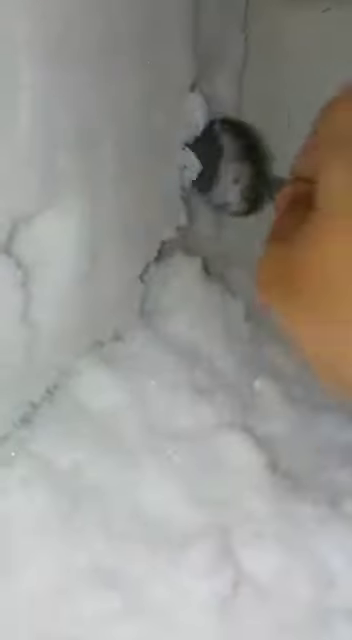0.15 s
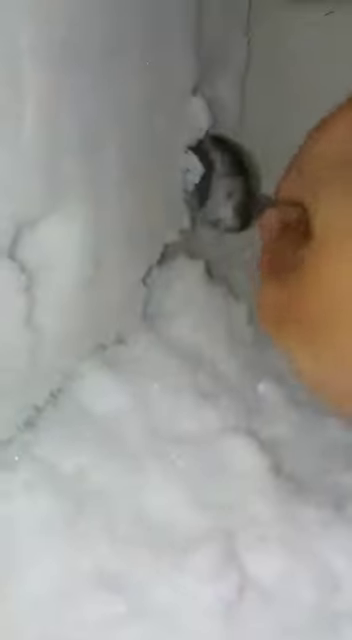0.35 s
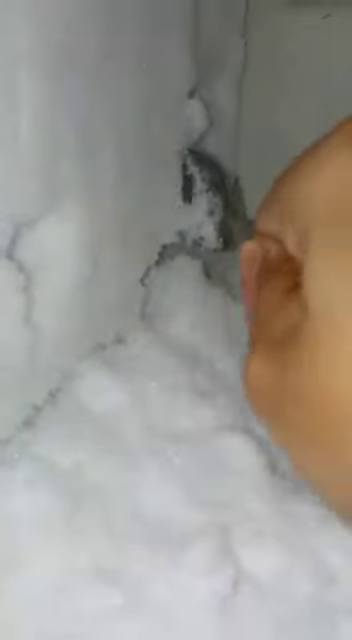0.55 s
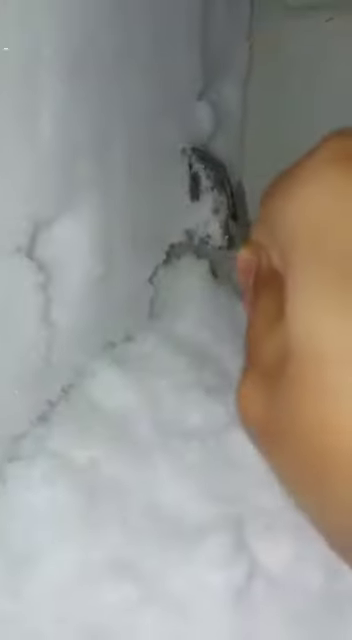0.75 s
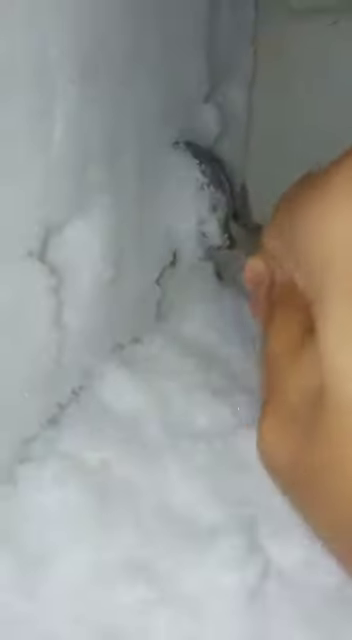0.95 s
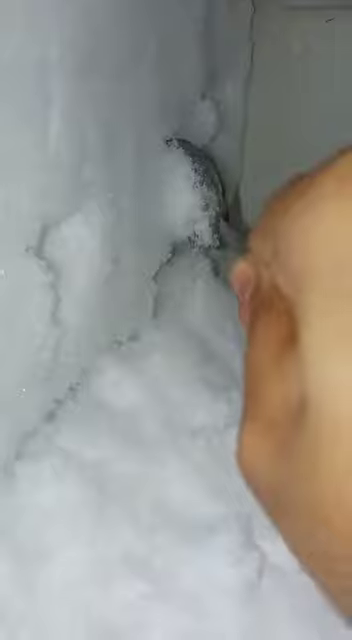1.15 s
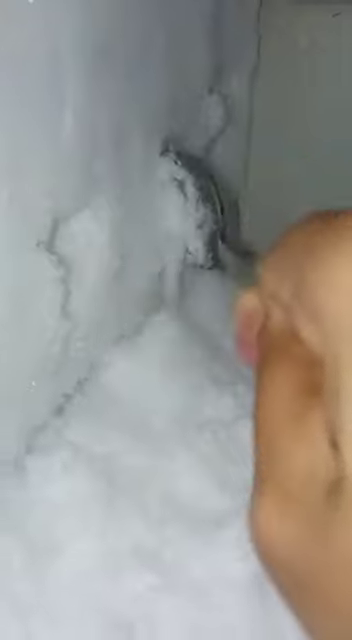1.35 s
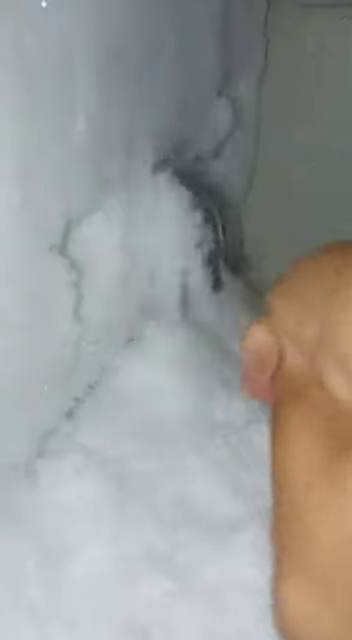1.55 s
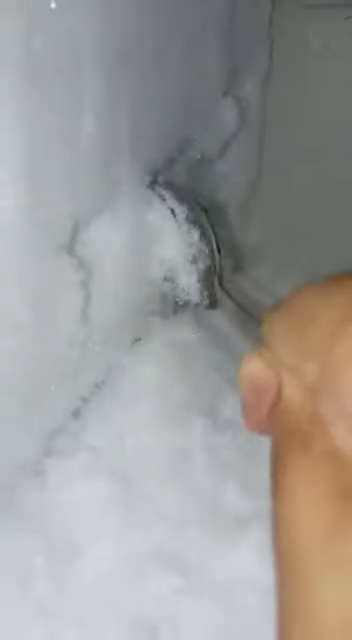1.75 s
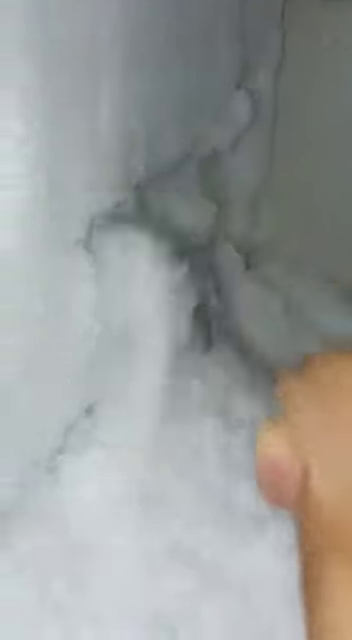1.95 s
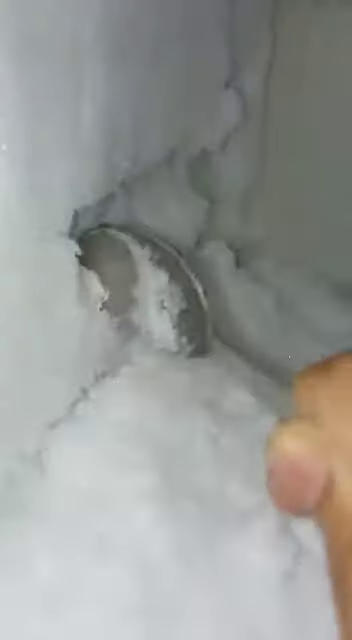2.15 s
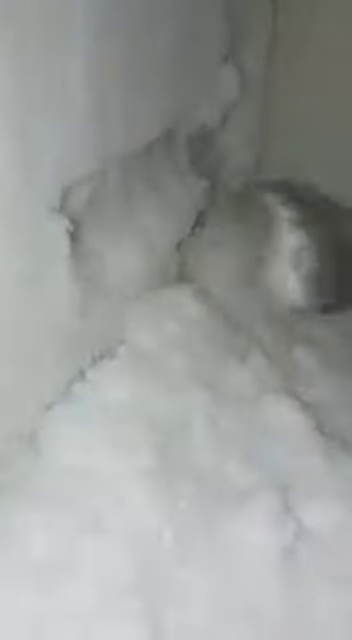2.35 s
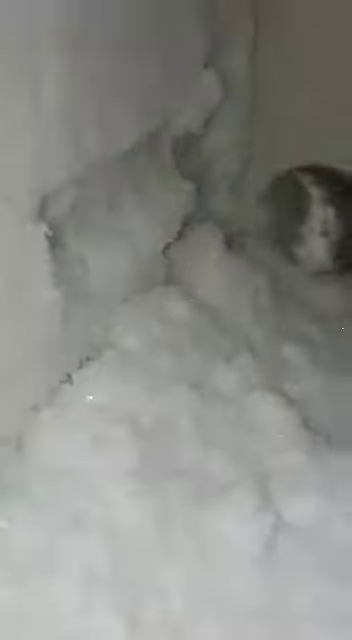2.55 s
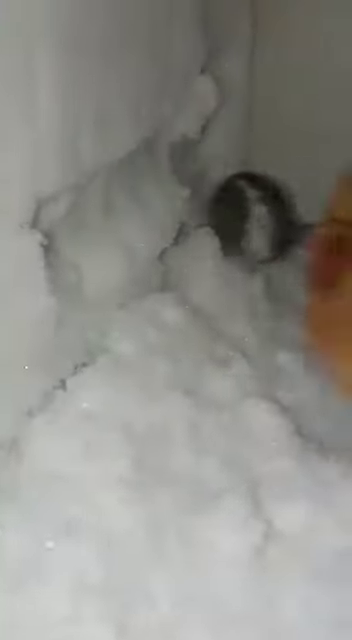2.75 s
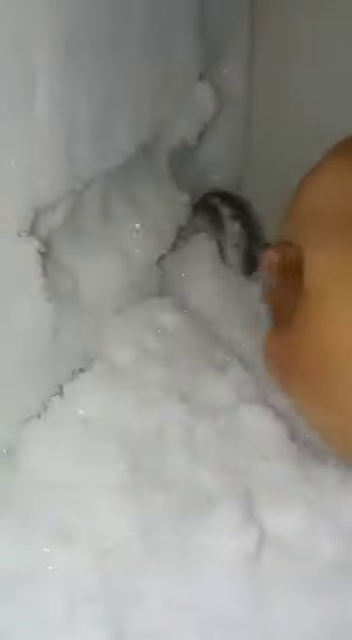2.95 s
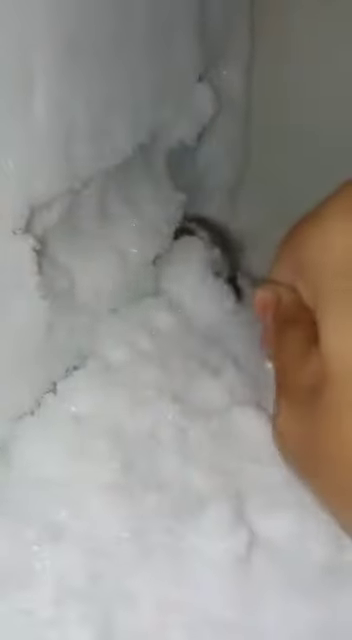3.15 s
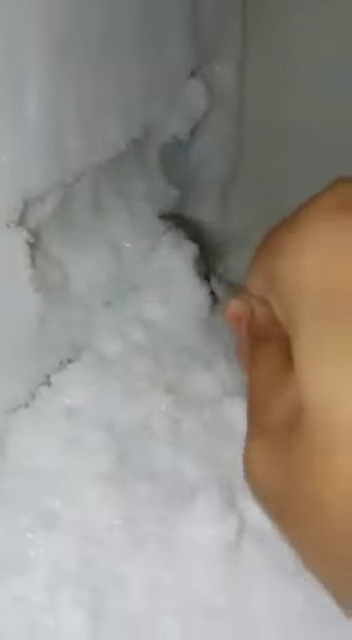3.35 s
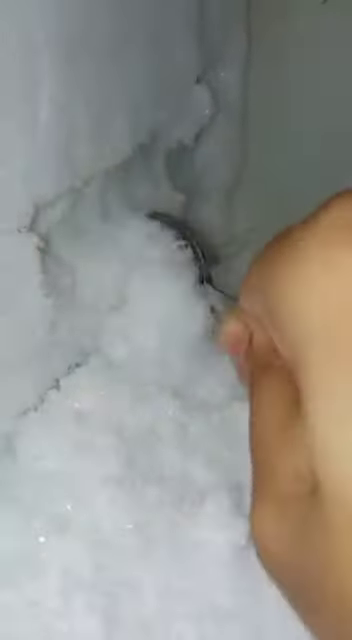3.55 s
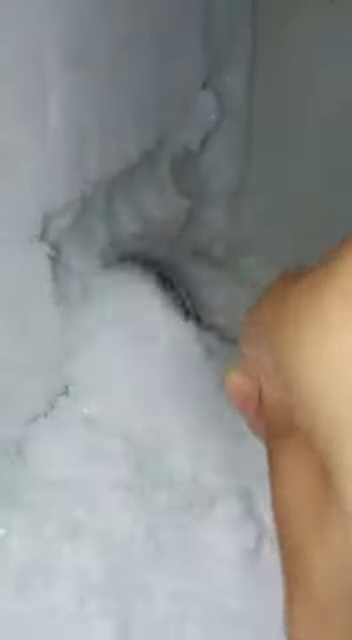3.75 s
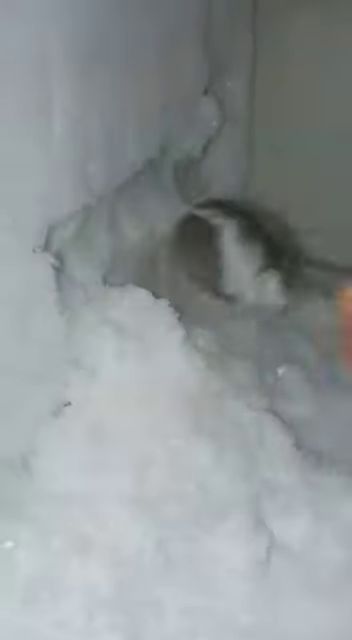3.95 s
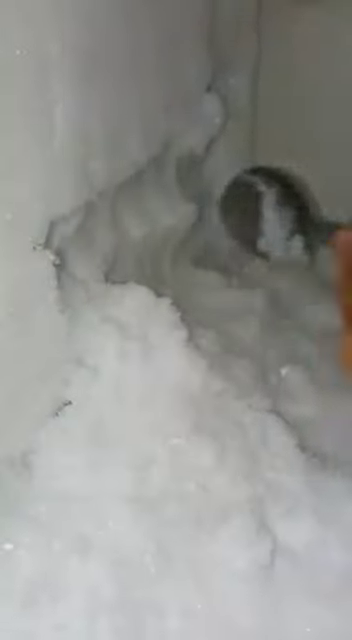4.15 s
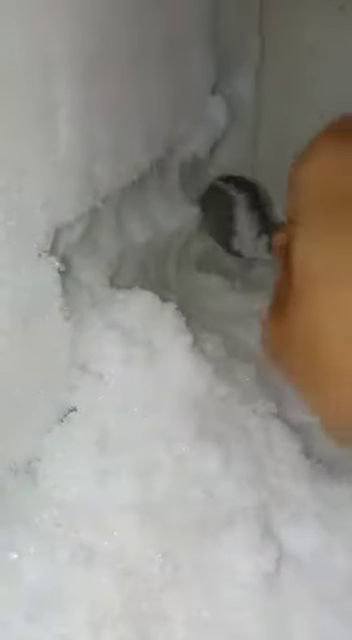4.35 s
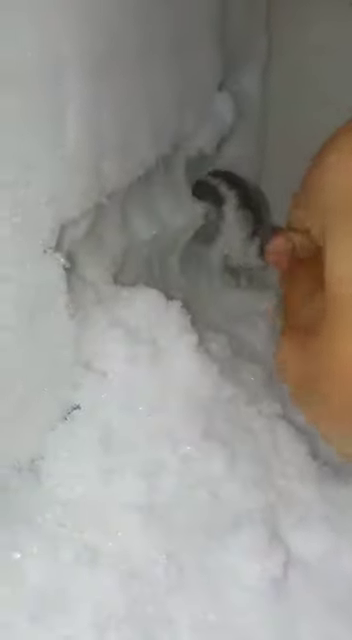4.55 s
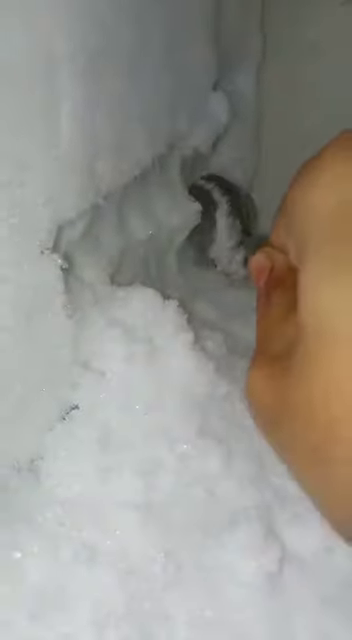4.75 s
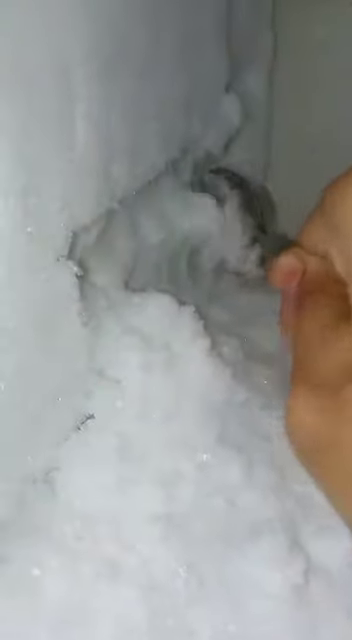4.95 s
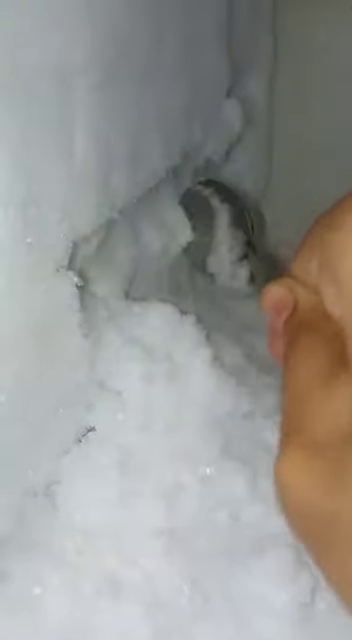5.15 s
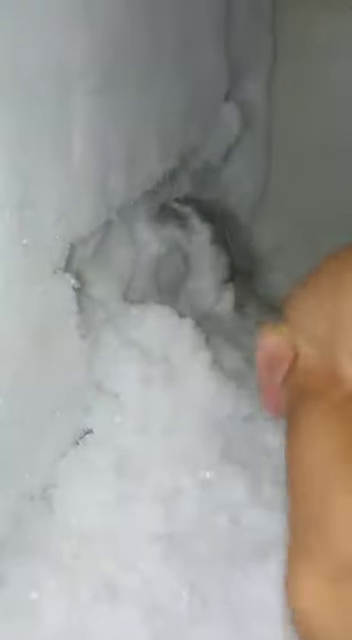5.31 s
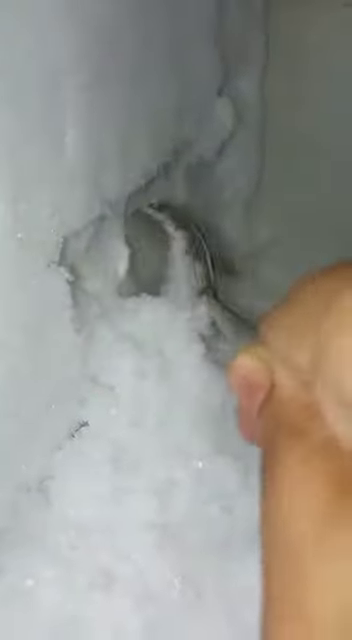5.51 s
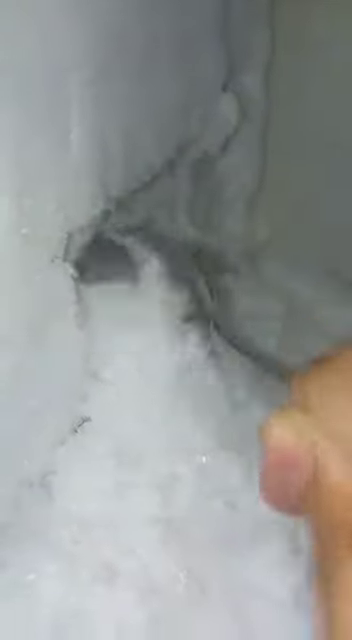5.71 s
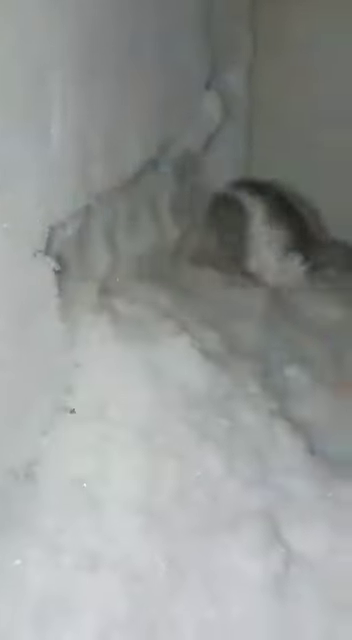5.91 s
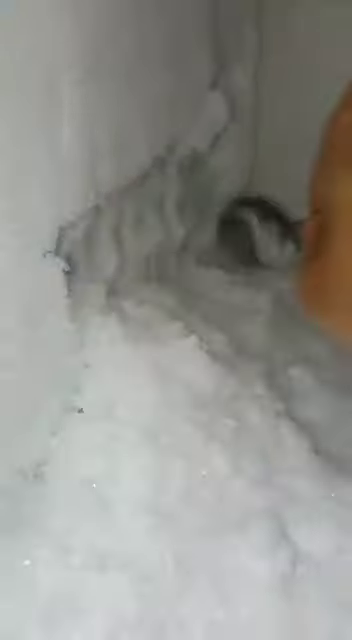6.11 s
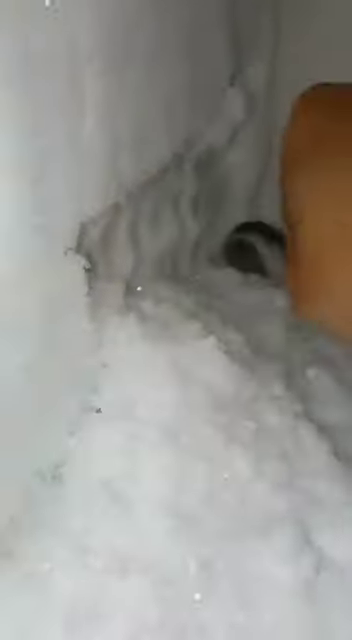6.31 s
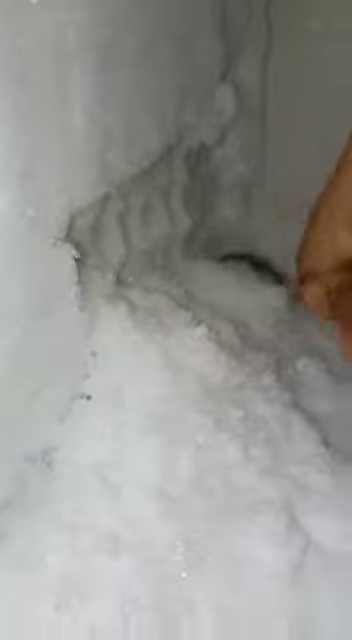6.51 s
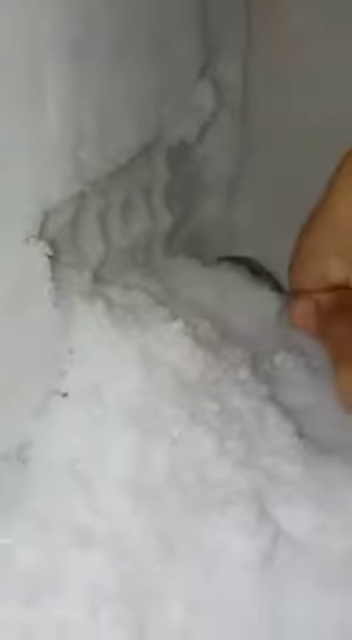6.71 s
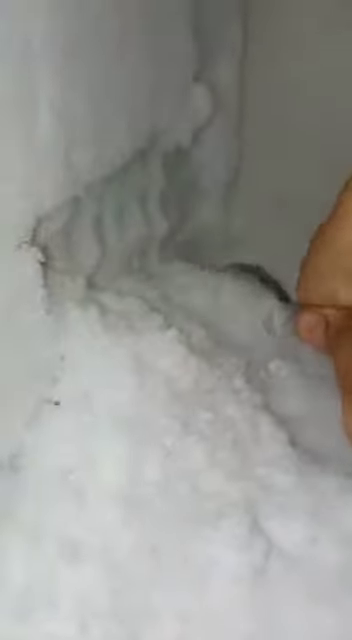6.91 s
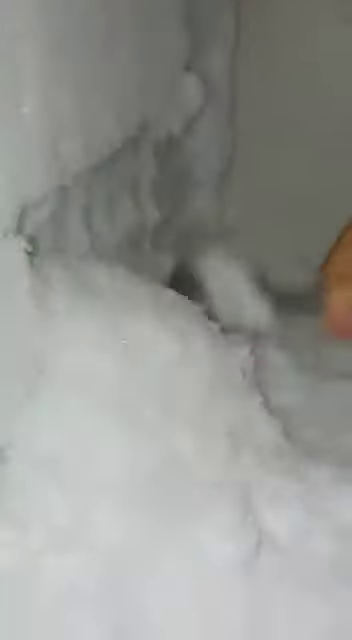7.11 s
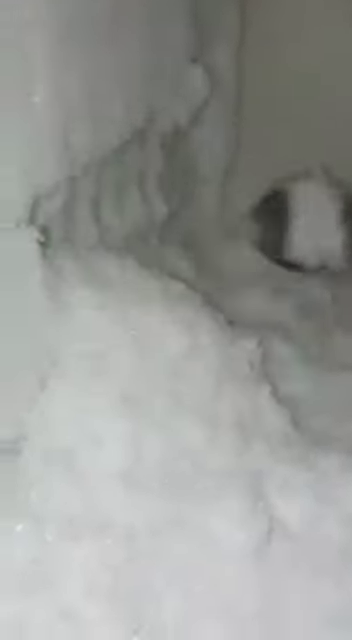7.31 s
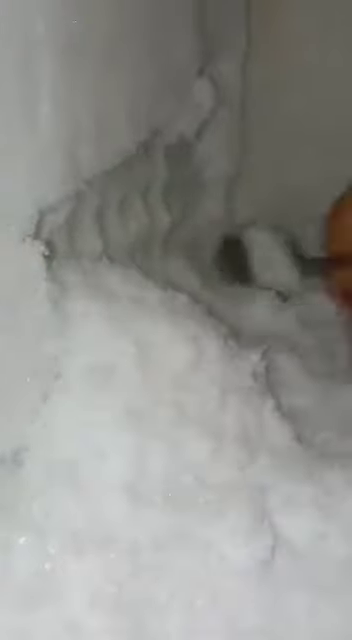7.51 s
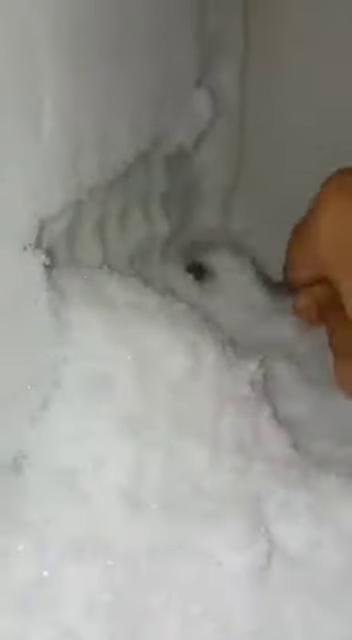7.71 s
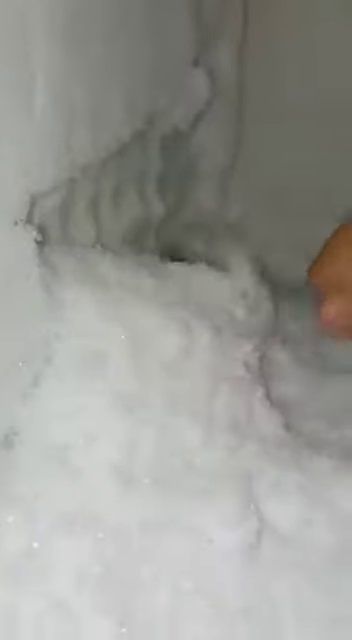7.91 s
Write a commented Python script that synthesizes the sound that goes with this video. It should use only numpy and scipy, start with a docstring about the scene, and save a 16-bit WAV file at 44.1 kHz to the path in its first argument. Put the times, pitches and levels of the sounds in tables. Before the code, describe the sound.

Bursts of crunchy, gritty scraping: a spoon edge rasps over frozen crust, with sharp cracks and a boxy knock from the wall behind. Busy strokes fill the first two seconds, then a pause; more groups follow, with shorter, sparser strokes near the end. Loose crumbs tick faintly in some gaps. The space is small and dull, the microphone close, with soft low rumble underneath.

```python
"""Inside a freezer, close to a small microphone, a metal spoon scrapes frost off the wall in short strokes.
Crystals crack under the edge as random clicks that ring the spoon, the thin liner, the wall and its panels.
Single cracks are short sprays of noise; crust breaking loose thumps the hollow cabinet, which adds a dull tail.
Loose crumbs tick in some pauses, and faint whistles and knocks come and go.
Shaped noise makes a low rumble and a dull hum underneath."""
import sys
import numpy as np
from scipy import signal
from scipy.fft import rfft, irfft
from scipy.io import wavfile
from scipy.ndimage import uniform_filter1d

SR = 44100
rng = np.random.default_rng(int(sys.argv[2]) if len(sys.argv) > 2 else 0)


def unload_audio(sound):
    """Save the sound as a 16-bit wav file, at the path given as the first command line argument."""
    columns = np.transpose(np.atleast_2d(sound))
    # keep every value between -1 and 1, then stretch to whole-number steps
    steps = np.round(np.clip(columns, -1, 1) * 32767)
    wavfile.write(sys.argv[1], SR, steps.astype(np.int16))


N = 351477  # length in samples, about 8 s

# The edge digs in. Each row: landing in seconds, turn and lift in seconds after landing,
# crystal level in dB at landing, turn and lift, then sizzle, liner, wall and panels in dB over
# the crystals (halfway through the contact), and the hollow's pitch in Hz.
STROKES = [(.186, 0.035, .055, -53, -42, -50.5, -9.5, 6.4, 11.2, 6.5, 576),
           (0.284, .028, .095, -56.5, -48.5, -40, -8, 9.9, 9.8, 0, 603),
           (0.378, 0.076, .12, -43.5, -38.5, -52.5, -7, 9.1, 15.3, 6, 597),
           (0.825, 0.16, .198, -47.5, -42.5, -48, -5, 7, 16.4, 7.5, 585),
           (1.151, .13, 0.17, -44.5, -40, -47.5, -5, 5.4, 15.9, 5, 570),
           (1.468, 0.11, .195, -43.5, -40, -50, -3.5, 5.8, 16.4, 7.5, 548),
           (1.858, 0.047, 0.28, -42.5, -38.5, -44, -3, 8.4, 17.3, 7, 518),
           (2.797, .03, .062, -42, -39.5, -43, -15, 6.5, 3, -4.5, 619),
           (2.872, 0.11, .33, -47.5, -38.5, -47.5, -10, 9.7, 8.5, 1.5, 618),
           (3.201, .03, 0.2, -35, -46, -47.5, -10, 8.6, 15.2, 9, 585),
           (3.435, 0.022, 0.14, -50, -41, -46, -8.5, 7.2, 14.5, 6.5, 627),
           (3.552, 0.085, 0.32, -44.5, -43, -42, -8, 7.1, 13.7, 8, 573),
           (3.79, .03, 0.056, -53, -45.5, -55, -4.5, 3.2, 9.7, 9, 572),
           (4.307, 0.028, 0.042, -44.5, -47.5, -50.5, -12, 8.7, 6.3, 5, 600),
           (4.373, 0.049, 0.31, -50, -42, -43, -9.5, 12.1, 16, 2.3, 619),
           (4.768, .06, .099, -49.5, -49, -59.5, -6.5, 9.6, 16.2, 9.5, 555),
           (4.867, .13, .17, -47, -40, -47.5, -7.5, 8.3, 18.7, 8, 572),
           (5.178, .02, .137, -42, -44, -41, -6, 6.4, 16.8, 8, 587),
           (5.318, 0.088, .134, -45, -37, -54, -5.5, 9.1, 18.5, 8, 570),
           (5.578, 0.063, 0.22, -46.5, -39, -46.5, -6, 8.4, 16.3, 8.5, 538),
           (6.177, 0.042, .073, -53.5, -43, -46.5, -6, 1.5, 3.3, 1.1, 551),
           (6.348, 0.15, .175, -45, -38.5, -51.5, -7, 3.2, 5.1, 0, 504),
           (6.878, 0.042, .069, -57, -48.5, -52, -12, 6.5, 9.5, 13.5, 489),
           (6.946, .012, .078, -43, -34, -48, -5.5, 3.6, 3.5, 7.5, 543),
           (7.424, .16, .203, -64.5, -44.5, -62.5, -10.5, 1.9, 11, 4, 516),
           (7.628, 0.025, .072, -61.5, -44, -39.5, -14, 2.2, 5, -1.5, 521),
           (7.699, 0.15, 0.2, -41.5, -39, -51, -9, 5.5, 11.4, 4.5, 522)]
# The edge trails lightly between strokes. Each row: start in seconds, turn and end in seconds after it,
# crystal level in dB at start, turn and end, sizzle in dB over the crystals, extra cabinet share in dB.
DRAGS = [(.243, .026, .045, -57.5, -77.5, -63.5, -18, 3.5), (0.498, .02, 0.047, -50, -54.5, -48.5, -9, 0.5),
         (0.548, 0.12, 0.17, -63.5, -57, -62, -7, -3), (.736, 0.031, .092, -73, -76, -75, -5, 2),
         (1.025, .07, 0.059, -70.5, -75, -67.5, -12, 1.5), (1.11, .028, 0.04, -65, -56.5, -54, -8, -2.5),
         (1.342, .05, 0.076, -65, -73.5, -61.5, -7, -2), (1.44, .014, 0.027, -60.5, -64.5, -52, -6, -2),
         (1.666, .055, .195, -64.5, -70.5, -63, -3, -1), (2.042, .1, .115, -63.5, -75, -74, -4, 3),
         (2.156, 0.033, 0.053, -72, -62, -78, 3, -0.5), (2.858, 0.0091, .012, -53, -62.5, -51.5, -21, -6),
         (3.857, .037, .115, -65.5, -86.5, -89, -9, 3.5), (4.354, .01, 0.019, -53.5, -64, -57, -19, -4),
         (4.626, .035, .075, -50.5, -55.5, -65, -9, 0), (4.7, 0.023, .071, -69, -67, -57.5, -12, 0.5),
         (5.04, 0.032, 0.22, -58.5, -67, -56, -9, 0), (5.453, .095, 0.18, -70.5, -82.5, -58.5, -8, 11.5),
         (5.762, 0.15, 0.24, -69, -90.5, -83.5, -4, 8.5), (6.248, 0.032, .099, -55, -60.5, -58, -11, -8),
         (6.523, 0.13, .28, -45, -58, -62, -14.5, -2), (6.815, 0.043, 0.06, -63.5, -62.5, -58, -17, 0.5),
         (7.026, 0.019, 0.074, -54.5, -62.5, -54, -9, 0), (7.094, 0.06, 0.11, -56, -71.5, -86, -2, -3.5),
         (7.23, 0.11, 0.17, -80.5, -93.5, -84, -7, -12), (7.872, .046, 0.077, -48, -68, -85, -6, 4)]
# Usual body sound of a light drag: liner, wall and panels in dB over the crystals.
DRAG_COLOUR_DB = [5.5, 15, 12.5]
# What sizzle, liner, wall and panels gain on the crystals from landing to lift-off, in dB.
GROWTH_DB = [1.7, .6, 2.2, 2.8]
# Single cracks. Each row: time in seconds, strength in dB, knock on liner and wall in dB over that strength.
CRACKS = [(.5242, -36, -4), (.5464, -50, 21), (.6426, -35, 8.5), (.838, -34, 0), (.852, -37, -3),
          (.8731, -23.5, 2), (.895, -28, -12), (.926, -30.5, 12.5), (1.113, -54, 9), (1.1508, -26.5, -5),
          (1.168, -33, -3), (1.181, -31, 2), (1.4233, -44, 4), (1.6227, -30, -15.5), (1.7927, -49, 15),
          (1.8203, -57.5, 12), (2.1864, -49, 6), (2.42, -66, -15), (2.7292, -58, 1), (3.2097, -23.5, -9),
          (3.3179, -23, -19), (3.4362, -27, 0.5), (3.8049, -34, 14.5), (3.848, -27, -9),
          (4.4038, -31.5, 10), (4.6973, -37, -19), (4.7257, -47.5, 16.5), (4.7516, -41.5, 13.5),
          (4.782, -30, 0), (4.8682, -25, -14), (5.0863, -43, -9), (5.092, -43, -9), (5.102, -40, 0),
          (5.112, -50, -5), (5.124, -27, -6.5), (5.136, -30, -6), (5.1392, -27, -16), (5.1585, -37.5, 7.5),
          (5.2878, -25.5, 3.5), (5.2224, -32.5, -2), (5.3355, -36.5, 12), (5.5889, -63, 2),
          (5.776, -53, -7), (5.7814, -52, -4), (5.833, -68, -4), (5.9166, -48, -16), (5.965, -50, -22),
          (5.981, -48, -12), (6.0761, -70, -10), (6.6715, -37.5, 9.5), (6.7473, -47.5, 13),
          (6.8006, -28.5, 1.5), (6.8069, -24, -2), (6.811, -28.5, -5), (6.8593, -44, 12), (6.8674, -37, 8),
          (7.4719, -58, -2)]
# Crumbs patter down. Each row: shower start in seconds, end in seconds, typical strength in dB.
CRUMBS = [(0.752, 0.817, -61), (5.86, 6.108, -61), (7.12, 7.3, -77)]
# Lumps of crust giving way. Each row: time in seconds, relative strength in dB.
CRUNCHES = [(.368, -19.5), (0.454, -12.5), (0.542, -22), (.828, -24), (.929, -17.5), (.983, -18),
            (1.233, -2), (1.473, -18), (1.566, -19), (1.793, -21), (1.896, -1.5), (1.986, -1.5),
            (2.028, -19), (3.08, 3), (3.244, -19.5), (3.319, -24), (3.413, -20), (3.454, -17),
            (3.635, -28.5), (4.31, -33), (4.377, -21), (4.525, -2.5), (4.562, -18), (4.767, -13),
            (4.911, -10), (4.945, -27), (4.987, -25), (5.024, 5), (5.162, -20), (5.189, -27), (5.221, -25),
            (5.335, -7.5), (5.37, -18.5), (5.581, 6.5), (5.658, 9.5), (5.61, -25), (6.806, -9), (6.95, -24),
            (7.848, -6)]
# Faint brief tones. Each row: start in seconds, length in seconds, pitch in Hz,
# width in Hz of each of two resonances in a row, level in dB before fading.
TONES = [(0, 0.19, 2994, 40, -76), (0, 0.12, 3320, 40.2, -77), (0, .051, 3660, 60, -81),
         (1.03, 0.061, 4630, 30, -74), (2.336, .036, 1235, 245, -64), (2.36, 0.069, 1165, 80.6, -80),
         (3.878, .063, 2390, 120, -78), (4.04, .028, 1255, 100, -78.5), (6.069, .016, 1250, 150, -81),
         (6.11, .028, 1220, 119, -75)]
# Colour of the breaking crystals. Each row: frequency in Hz, relative strength in dB per Hz.
CRYSTALS = [(880, -36), (1500, -17.5), (1850, -17.5), (2250, -8.5), (2600, -11), (4500, -14.5), (6370, -15),
            (7300, -17.5), (8160, -24), (9000, -17.5), (10000, -17), (12000, -24), (13700, -37),
            (14600, -17.5), (14900, -19.5), (15500, -19.5)]
# Ringing modes of the spoon. Each row: pitch in Hz, width in Hz, height in dB over the crystal colour.
SPOON = [(2470, 200, 1), (3160, 120, 4.5), (3850, 590, -1.5), (4890, 520, -1), (6440, 300, 2),
         (9840, 300, 3.5), (11600, 160, -2)]
# Modes of the thin liner under the edge. Each row: pitch in Hz, width in Hz, strength in dB.
LINER = [(901.5, 61, 5), (1040.6, 76, 3), (1231, 79, 3), (1358, 68, 1.5), (1538, 155, 1.5), (1685, 110, 1),
         (1782, 120, 1.5), (2027, 220, -4), (2136, 174, -3.5)]
# Modes of the freezer wall. Each row: pitch in Hz, width in Hz, strength in dB over the hollow.
WALL = [(565, 76, -20.5), (460, 170, -8.5), (696, 49, -10.5)]
# Modes of the large panels. Each row: pitch in Hz, width in Hz, strength in dB.
PANEL = [(164, 24, -1.5), (228, 45, 1), (308.7, 24, 0.5), (400, 29.4, -3)]
# Colour of the rumble. Each row: frequency in Hz, relative strength in dB per Hz.
RUMBLE = [(15, -66.5), (25, -20), (38, -47.5), (73, -6), (124, 5), (147, -3.5), (163, -3), (240, -14.5),
          (310, -69), (530, -120)]
# Rumble over time. Each row: time in seconds, upper part in dB (before shaking), deep part in dB.
RUMBLE_LEVEL = [(0, -52, -51.5), (.3, -45.5, -55), (.6, -47, -41), (1.0, -43, -44), (1.4, -44.5, -48.5),
                (1.9, -49, -49), (2.2, -50.5, -52), (2.75, -49.5, -47.5), (3.06, -45.5, -49),
                (3.65, -63, -46.5), (3.9, -52.5, -48), (4.3, -55, -67), (4.9, -52.5, -53.5),
                (5.7, -43, -56.5), (6.1, -63, -62), (6.5, -51.5, -60), (6.78, -67, -66), (6.95, -46, -58),
                (7.3, -61.5, -66), (7.87, -49, -50)]
# Colour of the hum. Each row: frequency in Hz, relative strength in dB per Hz.
HUM = [(200, -28.5), (250, -4.5), (330, -19.5), (408, -4.5), (500, -7), (640, -5), (750, -25), (900, -26),
       (1700, -28.5), (2300, -33.5), (3500, -37), (7000, -43), (16000, -62)]
# Hum over time. Each row: time in seconds, level in dB.
HUM_LEVEL = [(0, -63), (.2, -74), (1, -61.5), (2.2, -65.5), (2.5, -70.5), (2.8, -71), (3.9, -67.5),
             (4.1, -77.5), (4.3, -75.5), (5.5, -63.5), (6, -70), (6.2, -78), (7.2, -82), (7.4, -92),
             (7.97, -58.5)]

HOLLOW_WIDTH_HZ = 150
SIZZLE_HZ, FINE_TOP_HZ = 8200, 15700  # the sizzle lies between these
RELEASE_S = .008  # after lift-off the contact dies by 30 dB in this time
BRIDGE_S = .04  # a contact that ends this near the next one runs straight into it
JUDDER_DB, JUDDER_S = 1.07, .016  # the hand's pressure wavers: depth, smoothing time
CRACK_S = 0.0011  # a crack's spray decays with this time constant
CRACK_BODY_DB, CRACK_BRIGHT_DB = -2, -1.5
CRUMBS_PER_S, CRUMB_SPREAD_DB, CRUMB_KNOCK_DB = 25, 3, -10
SHAKE_DB, SHAKE_S = -8.5, 0.038  # strokes shake the cabinet as they do its panels: share, smoothing time
EDGE_HZ = 16900  # the finished sound stops above this


def scraping(spoon, gains, hollow_hz):
    """Fine fractures ring the spoon; the same ones and coarser breaks drive liner, wall and panels."""
    dense = grit(8000, 3.04, .003, 1.5)
    sparse = grit(1200, 1.5, 0.0025, 1.2)
    coarse = grit(2600, 2.45, .007, 1.6)
    # light contact breaks few crystals, one by one
    firm = gains[0] ** 2 / (gains[0] ** 2 + gain_of(-54.5) ** 2)
    fine = np.sqrt(firm) * dense + np.sqrt(1 - firm) * sparse
    crystals = drift(signal.oaconvolve(fine, spoon)[:N], 2.6, bins=2, frames=20)
    crystals = drift(crystals, 2.1, bins=8, frames=120)  # slower: grip and angle change
    body = evened(steep(crystals, 2000, SIZZLE_HZ)) * gains[0]
    sizzle = evened(steep(crystals, SIZZLE_HZ, FINE_TOP_HZ)) * gains[1]
    drive = .6 * fine + 0.8 * coarse
    bodies = (lambda x: band(modes(x, LINER), 680, 2300),
              lambda x: wall(x, hollow_hz),
              lambda x: modes(x, PANEL))
    ringing = 0
    for ring, gain, db in zip(bodies, gains[2:], (-.7, -2.5, -1.5)):
        # dividing by the steady response lets the gain set the level
        ringing = ringing + gain_of(db) * ring(drive * gain) / np.std(ring(drive))
    return body + sizzle + drift(ringing, 1.68, bins=2, frames=16)


def controls():
    """Edge pressure as gains of five layers (crystals, sizzle, liner, wall, panels), and the hollow's pitch."""
    t, power = np.arange(N) / SR, np.zeros((5, N))
    drags = [(*row[:7], *np.add(DRAG_COLOUR_DB, row[7])) for row in DRAGS]
    contacts = sorted([tuple(row[:10]) for row in STROKES] + drags)
    following = contacts[1:] + [(np.inf,)]
    for contact, after in zip(contacts, following):
        start, turn, lift, land_db, turn_db, lift_db, *over_db = contact
        gap = after[0] - start
        if gap < lift + BRIDGE_S:
            lift = gap
        on = (t >= start) & (t < start + lift + RELEASE_S)
        since = t[on] - start
        db = np.interp(since, [0, min(turn, lift), lift, lift + RELEASE_S],
                       [land_db, turn_db, lift_db, lift_db - 30])
        growth_db = np.outer([0, *GROWTH_DB], since / lift - .5)
        power[:, on] += gain_of(db + np.r_[0, over_db][:, None] + growth_db) ** 2
    judder = slow_noise(round(JUDDER_S * SR))
    rows = np.array(STROKES)
    hollow_hz = np.interp(t, rows[:, 0] + rows[:, 2] / 2, rows[:, -1])  # glides between stroke middles
    gains = uniform_filter1d(np.sqrt(power) * gain_of(JUDDER_DB * judder), 60, axis=1)
    return gains, hollow_hz


def grit(per_s, spread_db, clump_s, clump_db):
    """Random fractures of uneven size that come in clumps."""
    size = gain_of(spread_db * np.minimum(rng.exponential(1, N), 4.2))
    hits = size * (rng.random(N) < per_s / SR)
    clumps = slow_noise(max(round(clump_s * SR), 2))
    return evened(hits * rng.choice([-1., 1.], N) * gain_of(clump_db * clumps))


def drift(x, patchy_db, bins, frames):
    """The colour wanders in patches as the contact point moves over the spoon and wall."""
    z = signal.stft(x, nperseg=512, noverlap=384)[2]
    patches = uniform_filter1d(rng.standard_normal(z.shape), bins, 0)
    patches = evened(uniform_filter1d(patches, frames, 1))
    return signal.istft(z * gain_of(patchy_db * patches), nperseg=512, noverlap=384)[1][:N]


def spoon_response():
    """Crystal colour with the spoon's ringing modes standing out of it."""
    hz = np.fft.rfftfreq(4096, 1 / SR)
    peaks = sum(db / (1 + (2 * (hz - f) / width) ** 2) for f, width, db in SPOON)
    return causal(read(CRYSTALS, hz) + peaks)


def wall(x, hollow_hz):
    """The wall's modes plus the resonant hollow between spoon, hand and frost."""
    return band(resonate(x, hollow_hz, HOLLOW_WIDTH_HZ) + modes(x, WALL), 380, 820)


def cracks(spoon):
    """Each crack is a short spray of fractures into the spoon, with a blow to liner and wall."""
    bursts, blows, t = np.zeros(N), np.zeros(N), np.arange(600) / SR
    snap = 1.76 * np.exp(-(t / .00006) ** 2)  # the first break is one hard step
    for s, db, knock_db in list(CRACKS) + crumbs():
        burst = gain_of(db) * (snap + rng.standard_normal(len(t)) * np.exp(-t / CRACK_S))
        add(bursts, s, burst)
        add(blows, s, gain_of(knock_db) * burst)
    spray = gain_of(CRACK_BODY_DB) * band(bursts, 1800, 8200)
    spray = spray + gain_of(CRACK_BRIGHT_DB) * band(bursts, 8200, 16300)
    ringing = signal.oaconvolve(spray, spoon / np.linalg.norm(spoon))[:N]
    knocks = gain_of(5.5) * modes(blows, LINER + WALL) + gain_of(-3.5) * band(blows, 300, 2400)
    return ringing + knocks


def crumbs():
    """Falling crumbs are tiny cracks at random moments of each shower."""
    tries = 40  # possible crumbs per shower; chance decides which of them fall
    when, luck = rng.random((2, len(CRUMBS), tries))
    size = rng.standard_normal((len(CRUMBS), tries))
    ticks = []
    for (start, end, db), moments, lucks, sizes in zip(CRUMBS, when, luck, size):
        chance = CRUMBS_PER_S * (end - start) / tries
        for u, p, z in zip(moments, lucks, sizes):
            if p < chance:
                ticks.append((start + u * (end - start), db + CRUMB_SPREAD_DB * z, CRUMB_KNOCK_DB))
    return ticks


def crunches(hollow_hz):
    """A lump yields over a few milliseconds and shakes wall and panels."""
    blows, t = np.zeros(N), np.arange(800) / SR
    swell = (t / 0.0022) * np.exp(-t / 0.0021)
    for s, db in CRUNCHES:
        add(blows, s, gain_of(db + 0.5) * rng.standard_normal(len(t)) * swell)
    return wall(blows, hollow_hz) + gain_of(-8.5) * modes(blows, PANEL)


def cabinet(x, t60=0.11):
    """Short, dull tail of the frosted compartment: noise that falls 60 dB in t60 seconds."""
    t = np.arange(SR // 3) / SR
    tail = rng.standard_normal(len(t)) * gain_of(-60 * t / t60) * (t > .002)
    tail = band(tail, 240, 1200)
    return signal.oaconvolve(x, tail / np.linalg.norm(tail))[:N]


def tones():
    """Faint, slightly unsteady whistles and knocks: noise through two narrow resonances."""
    out = np.zeros(N)
    for s, length, hz, width_hz, db in TONES:
        noise = rng.standard_normal(4096 + round(.25 * SR))
        tone = resonate(resonate(noise, hz, width_hz), hz, width_hz)
        tone = tone[4096:][:round(length * SR)]  # skip the build-up
        fade = signal.windows.tukey(len(tone), .3) * gain_of(np.linspace(3, -4, len(tone)))
        add(out, s, gain_of(db) * evened(tone) * fade)
    return out


def background(panels):
    """Shaped noise: a lumpy low rumble in an upper and a deep part, and a dull broad hum."""
    hz, t = np.fft.rfftfreq(N, 1 / SR), np.arange(N) / SR
    s, upper_db, deep_db = np.transpose(RUMBLE_LEVEL)
    deep = 1 / np.sqrt(1 + (hz / 95) ** 12)  # splits the rumble at 95 Hz
    rumble = gain_of(read(RUMBLE, hz))
    colours = [rumble * np.sqrt(1 - deep ** 2), rumble * deep, gain_of(read(HUM, hz))]
    shake = gain_of(SHAKE_DB) * uniform_filter1d(panels, round(SHAKE_S * SR))
    levels = [np.hypot(gain_of(np.interp(t, s, upper_db)), shake),
              gain_of(np.interp(t, s, deep_db)),
              gain_of(np.interp(t, *np.transpose(HUM_LEVEL)))]
    noises = irfft(rfft(rng.standard_normal((3, N))) * np.vstack(colours), N)
    return sum(evened(noise) * level for noise, level in zip(noises, levels))


def gain_of(db):
    """Decibels to amplitude."""
    return 10 ** (np.asarray(db) / 20)


def evened(x):
    """Scales to an rms (average strength) of 1."""
    return x / np.sqrt(np.mean(x ** 2) + 1e-20)


def slow_noise(width):
    """Random wavering: noise averaged twice over width samples, at rms 1."""
    return evened(uniform_filter1d(uniform_filter1d(rng.standard_normal(N), width), width))


def read(points, hz):
    """Reads a spectrum's dB between its points, on a log-frequency axis."""
    f, value = np.transpose(points)
    return np.interp(np.log(hz + 1), np.log(f + 1), value)


def add(mix, s, sound):
    """Mixes a sound in at s seconds."""
    part = mix[max(round(s * SR), 0):][:len(sound)]
    part += sound[:len(part)]


def resonate(x, hz, width_hz):
    """A resonance of gain 1 whose pitch may move: shifts hz down to zero, smooths, and shifts back."""
    turn = np.exp(2j * np.pi * np.cumsum(hz * np.ones(len(x))) / SR)
    r = np.exp(-np.pi * width_hz / SR)
    return 2 * (turn * signal.lfilter([1 - r], [1, -r], x / turn + 1e-18)).real


def modes(x, table):
    """Rings a set of fixed modes, each of gain 1 before its table level, alternate ones in opposite phase."""
    out = 0
    for k, (hz, width_hz, db) in enumerate(table):
        out = out + (-1) ** k * gain_of(db) * signal.lfilter(*signal.iirpeak(hz, hz / width_hz, SR), x)
    return out


def causal(db):
    """Minimum-phase response (energy as early as possible) for gains at each bin of a 4096-point transform."""
    log_gain = np.log(gain_of(np.maximum(np.r_[db, db[-2:0:-1]], -100)))
    return np.fft.ifft(np.exp(np.conj(signal.hilbert(log_gain)))).real[:2048]


def band(x, lo_hz, hi_hz, order=2):
    """Causal band-pass."""
    return signal.sosfilt(signal.butter(order, [lo_hz, hi_hz], "bandpass", fs=SR, output="sos"), x)


def steep(x, lo_hz, hi_hz):
    """Steep band-pass without delay."""
    return signal.oaconvolve(x, signal.firwin(255, [lo_hz, hi_hz], pass_zero=False, fs=SR), "same")


def scene():
    """All sources, one channel; the near ones also sound in the cabinet."""
    spoon = spoon_response()
    gains, hollow_hz = controls()
    near = scraping(spoon, gains, hollow_hz) + cracks(spoon) + crunches(hollow_hz)
    mix = near + gain_of(-21.0) * cabinet(near) + tones() + background(gains[4])
    return mix[None]


def record(dry):
    """The band limit: a low-pass that removes the highest treble."""
    lowpass = signal.firwin(511, EDGE_HZ, window=("kaiser", 9), fs=SR)
    return signal.oaconvolve(dry, lowpass[None], "same")


dry = scene()
out = record(dry)
unload_audio(out)
```